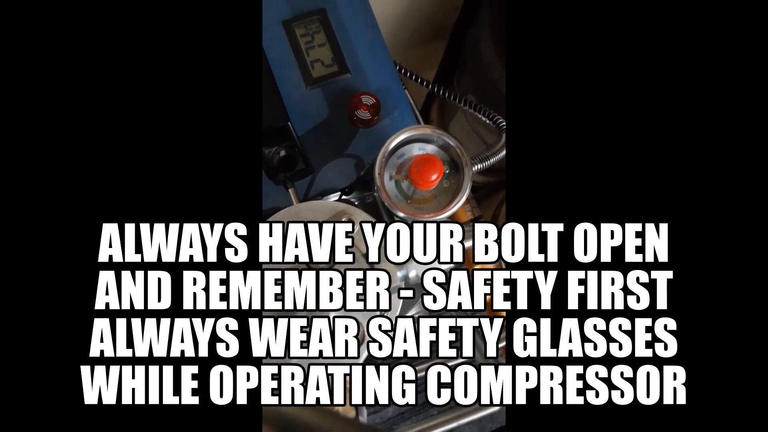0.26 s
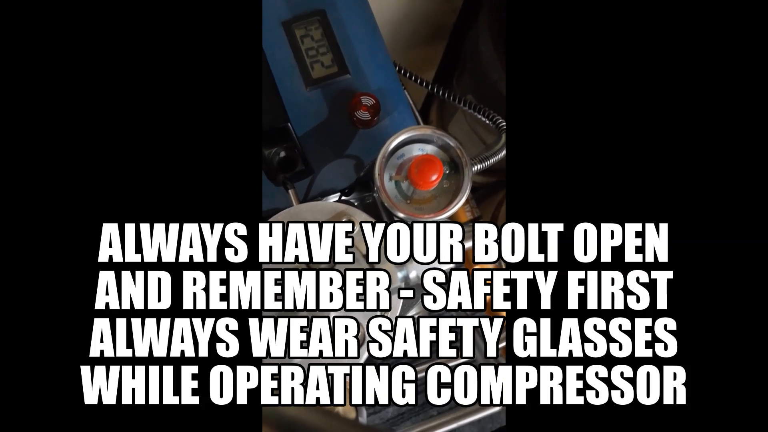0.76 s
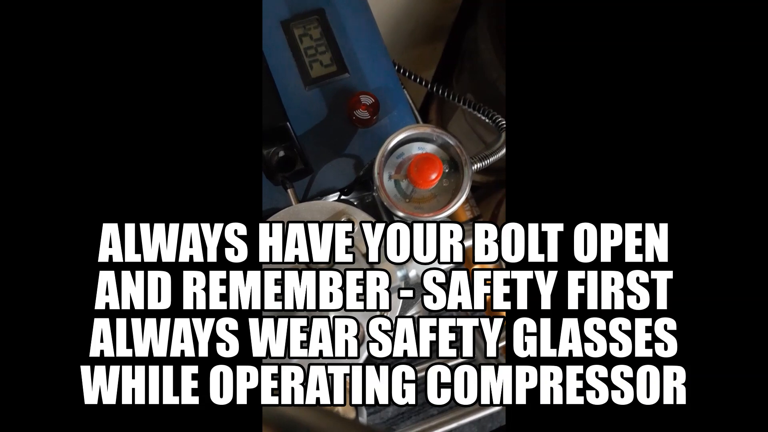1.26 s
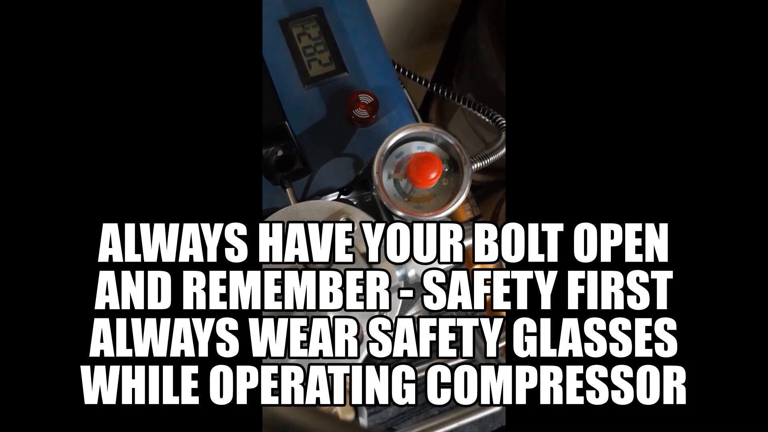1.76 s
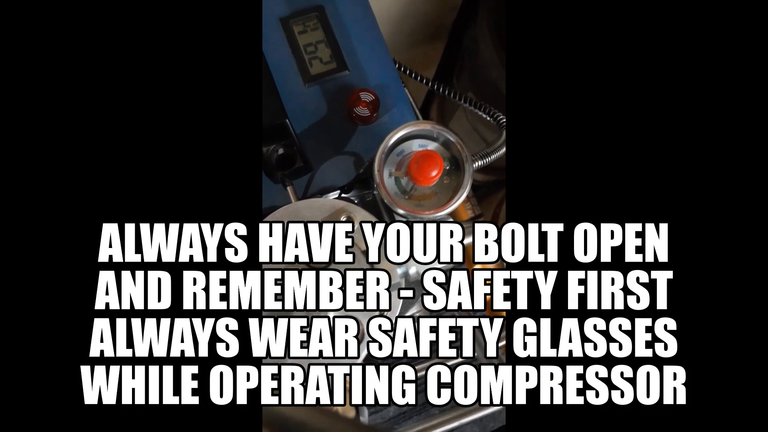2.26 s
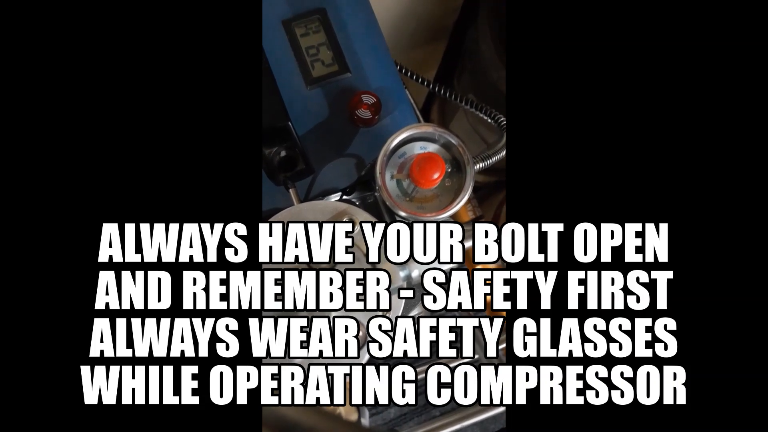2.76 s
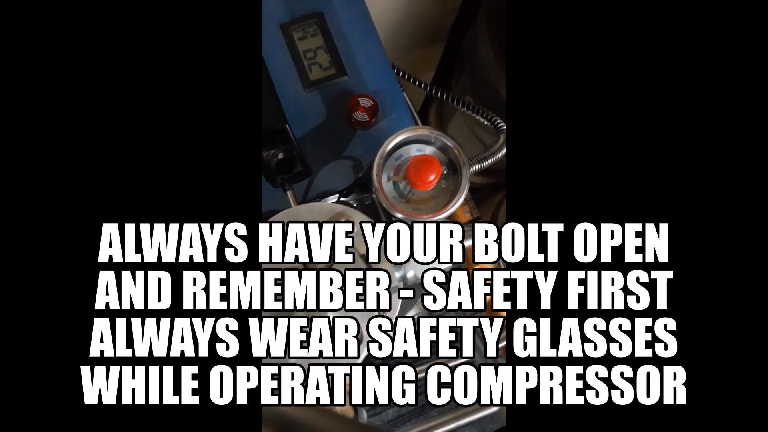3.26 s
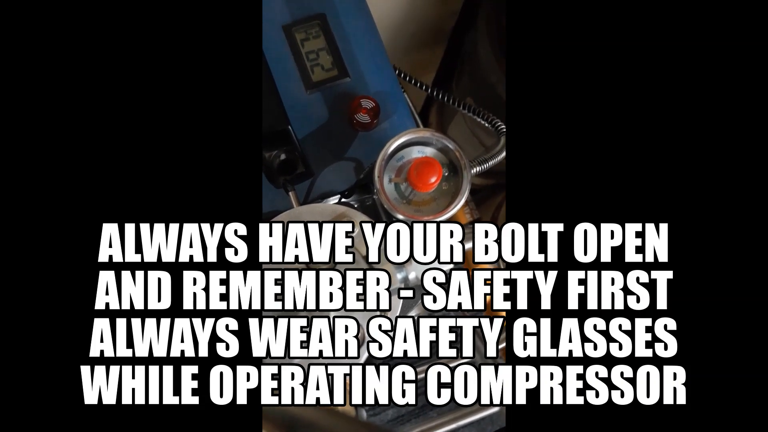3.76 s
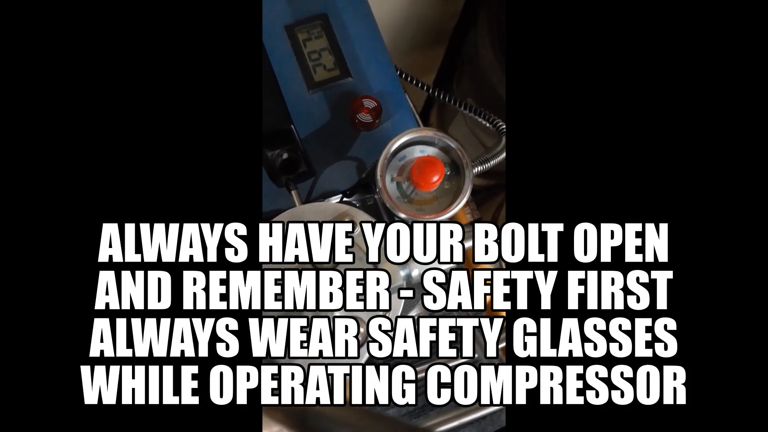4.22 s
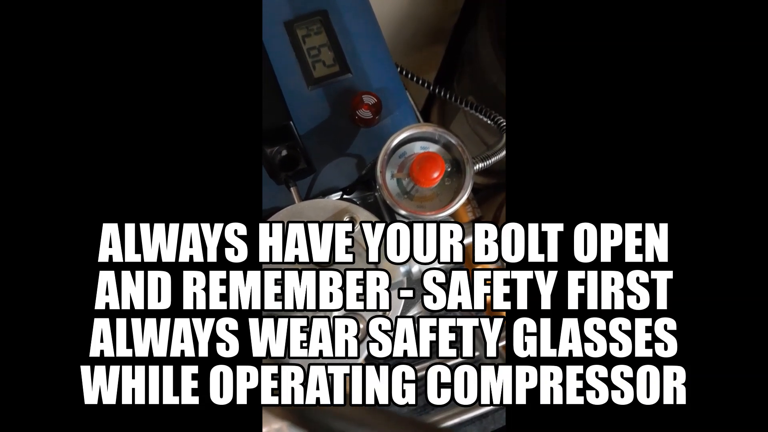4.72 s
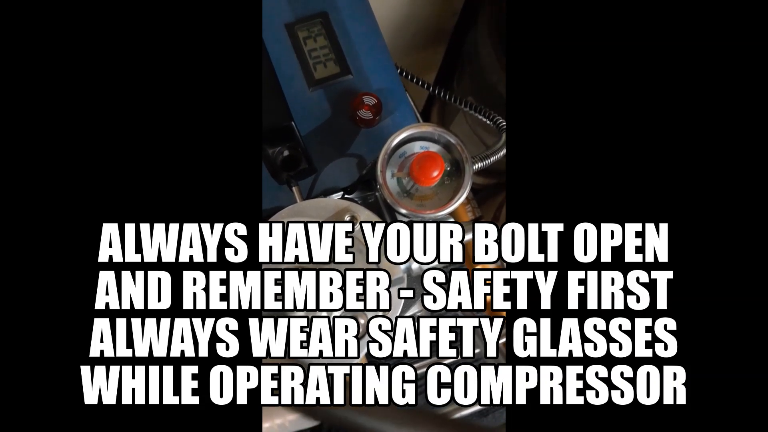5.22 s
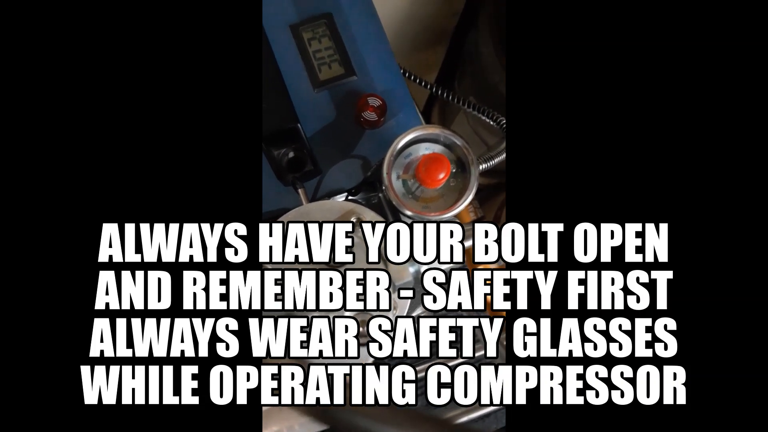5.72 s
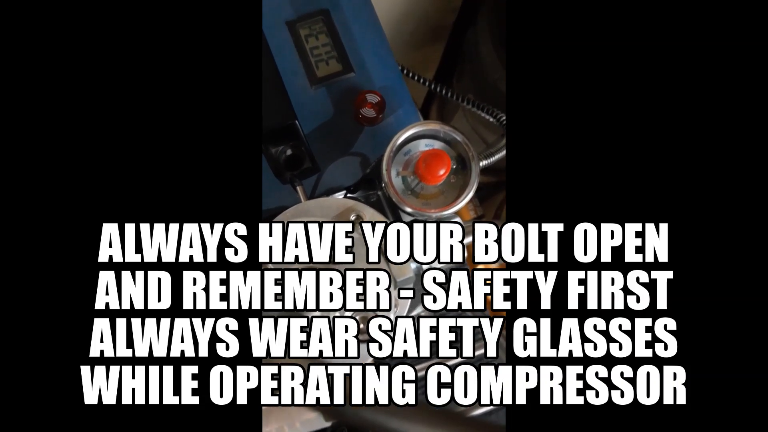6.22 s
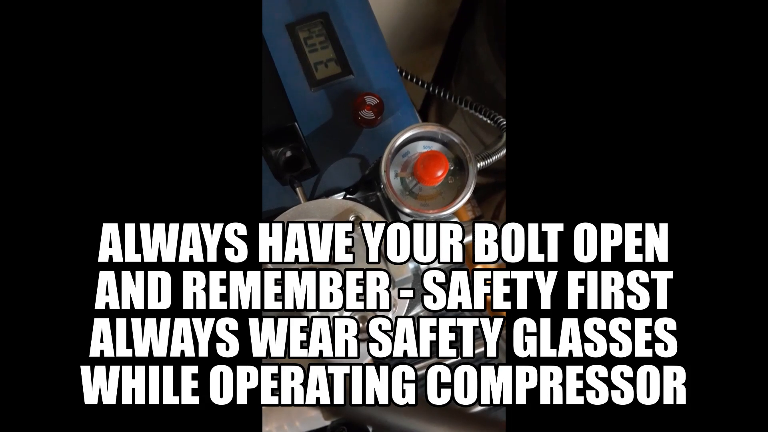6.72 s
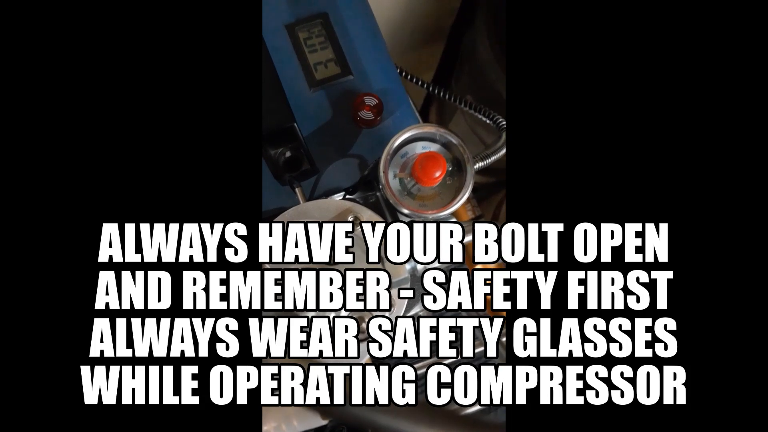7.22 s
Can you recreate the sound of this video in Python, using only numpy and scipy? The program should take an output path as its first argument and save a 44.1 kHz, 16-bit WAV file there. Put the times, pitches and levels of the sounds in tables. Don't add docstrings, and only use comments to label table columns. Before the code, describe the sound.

From 0 s a small high-pressure piston compressor is already at full speed, close to a phone with two microphone ports indoors, and it continues without pause to the end at about 7.4 s. Roughly fifty-six valve knocks per second merge into a dense, hard metallic hammering, with casing resonances around 500 to 900 Hz and brighter rattles above. A strong, steady hum near 336 Hz sits with it, wavering slightly. Each turn brings quick hisses of air before, at and after the knock, over soft broadband fan noise. A thin plate chatters and sings near 12 kHz, easing back gradually. Over the seconds the speed and pitch drop only very slightly; the casing ring gradually strengthens, and from about 6 s the hum swells modestly. The sound is loud, dry and close, with slightly different tone left and right, a cut top end and possible clipped peaks.

```python
import sys
import numpy as np
from scipy import signal
from scipy.fft import rfft, irfft, next_fast_len
from scipy.io import wavfile
from scipy.ndimage import uniform_filter1d

SR = 44100
rng = np.random.default_rng(int(sys.argv[2]) if len(sys.argv) > 2 else 0)


def dump_mix(stems):
    frames = np.atleast_2d(stems).T
    limited = np.clip(frames, -1, 1)
    pcm = np.round(limited * 32767).astype(np.int16)
    wavfile.write(sys.argv[1], SR, pcm)


def ratio_of_db(decibels):
    return 10 ** (np.asarray(decibels, float) / 20)


N = 329862

# (frequency [Hz], left level [dB], right level [dB])
FAN_COLOUR = [(20, -29, -34), (45, -12.5, -7), (171, -6.5, -17), (463, -4.5, -11), (920, -6, -9),
              (1050, -7.5, -9), (1500, -6, -2.5), (1550, -4.5, -8), (1970, -3.5, -7), (2720, -12, -5),
              (3900, -15.5, -12), (6500, -21.5, -28), (10000, -23, -29.5), (15700, -36.5, -22)]
# (frequency [Hz], left level [dB], right level [dB])
PUFF_COLOUR = [(706, -18, -21), (1200, -16, -21), (1770, -17, -16), (2520, -32, -26), (4000, -24.5, -11),
               (7000, -14.5, -15), (6900, -18, -18), (8230, -12.5, -21.5), (9800, -21, -21),
               (10170, -16, -21.5), (12900, -11, -18), (13900, -17.5, -25), (14900, -35, -30),
               (15900, -21, -32)]
# (frequency [Hz], likeness [0-1])
LIKENESS = [(60, 0.23), (300, 0.7), (1400, 0.15), (3000, 0), (7000, 0.05), (15000, 0)]
# (start [turns], rise [turns], hold [turns], fall [turns], level [dB])
AIR_PUFFS = [
    (0, .008, .012, .02, 0),
    (.02, .01, .06, .03, -6),
    (-.26, .03, .24, .02, -11),
    (.165, .008, .005, .015, -9),
    (.25, .008, .005, .02, -11),
]
# (time after the knock [turns], level [dB])
PLATE_TAPS = [
    (0, 0),
    (.03, -3),
    (.06, -2),
    (.15, -7),
    (.235, -9),
    (.8, -14),
    (.88, -13),
]
# (time after the knock [turns], level [dB])
VALVE_BLOWS = [
    (-.0126, 0),
]
# (time after the knock [turns], level [dB])
VALVE_BOUNCES = [
    (.17, -22.5),
    (.25, -20),
    (.48, -19),
    (.76, -16.5),
    (0.879, -26.5),
]
# (frequency [Hz], width [Hz], left gain [ratio], right gain [ratio])
CASING_MODES = [ (396, 8, -2.32, -4.51), (450, 8, -2.78, 1.2), (514, 8, -27.3, -22.2), (521, 11, 26.2, 22),
                (658, 55, 1.6, .21), (674, 8, -1.78, -1.92), (820, 28, -1.87, -1.29), (881, 8, 6.61, 3.82),
                (957, 12, .32, .69), (1134, 17, -2.82, -1.56), (1337, 287, -.09, 4.91),
                (1361, 178, .07, -5.16), (1581, 69, .95, -1.95), (1615, 51, .95, 1.8),
                (1804, 272, -2.86, -.58), (1899, 27, -.09, -1.78), (2106, 219, -1.35, 1.16),
                (2325, 2652, 1.27, -.96), (2359, 89, -.83, -.88), (2479, 111, -1.02, -.93),
                (2689, 590, -1.05, -.16), (3195, 91, .17, -.34), (3363, 600, -1, 1.28),
                (3448, 251, .36, -.73), (3941, 600, -.06, .68), (4614, 1200, -1.14, .16),
                (4723, 587, .62, .51), (5956, 295, -.57, .17), (3770, 90, .35, .55),
                (6453, 204, -.34, -1.02)]
# (multiple of shaft speed [ratio], left level [dB], right level [dB])
HOUSING_TONES = [(1, -53.3, -59.2), (2, -31.3, -31.4), (3, -36.4, -36.6), (4, -43.8, -39),
                 (5, -43.2, -31.4), (10, -50, -48), (11, -37, -36), (13, -43, -40)]

START_SPEED, FULL_SLOWING = 56.08995, .529835
FILL_S = 12.7605
FIRST_KNOCK_TURN = .0906
RIGHT_LAG = 14
KNOCK_DB = -1.1


def level(x, db):
    return x * ratio_of_db(db) / np.sqrt(np.mean(x ** 2))


def ring(x, hz, width):
    return signal.lfilter(*signal.iirpeak(hz, hz / width, fs=SR), x)


def walk(rate):
    span = int(SR / rate)
    smooth = uniform_filter1d(rng.standard_normal(N), span)
    return level(uniform_filter1d(smooth, span), 0)


def air(noise, colour):
    size = next_fast_len(N)
    log_hz = np.log(np.fft.rfftfreq(size, 1 / SR) + 1)
    hz, like = np.transpose(LIKENESS)
    like = np.clip(np.interp(log_hz, np.log(hz), like), 0, 1)
    shared, opposite = rfft(noise, size) * np.sqrt([1 + like, 1 - like])
    hz, *ports = np.transpose(colour)
    gain = ratio_of_db([np.interp(log_hz, np.log(hz), db) for db in ports])
    left, right = irfft(gain * [shared + opposite, shared - opposite], size)[:, :N]
    return level(np.array([left, np.roll(right, RIGHT_LAG)]), 0)


def pushes(turn, table, jitter_s, scatter_db, push_s):
    turns = np.arange(int(turn[0]), int(turn[-1]) + 1)
    chance = rng.standard_normal((len(turns), len(table), 2))
    share, db = np.transpose(table)
    at = np.interp(turns[:, None] + share, turn, np.arange(len(turn)))
    at = at + jitter_s * SR * chance[..., 0]
    near = np.clip(at.astype(int)[..., None] + np.arange(-16, 17), 0, len(turn) - 1)
    bell = np.exp(-.5 * ((near - at[..., None]) / (push_s * SR)) ** 2)
    push = bell * ratio_of_db(db + scatter_db * chance[..., 1])[..., None]
    return np.bincount(near.ravel(), push.ravel(), len(turn))


def fan():
    return air(rng.standard_normal((2, N)), FAN_COLOUR) * ratio_of_db(-27.0 + .5 * walk(6.1))


def puffs(turn):
    scatter_db = 1.2
    size = ratio_of_db(scatter_db * rng.standard_normal((int(turn[-1]) + 3, len(AIR_PUFFS))))
    gate = 0
    for k, (share, rise, hold, fall, db) in enumerate(AIR_PUFFS):
        since = (turn - share + .25) % 1 - .25
        cycle = np.round(turn - share - since).astype(int) + 1
        swell_and_fade = np.minimum(since / rise, (hold - since) / fall)
        gate = gate + ratio_of_db(db) * size[cycle, k] * np.exp(np.minimum(swell_and_fade, 0))
    return air(gate * rng.standard_normal((2, N)), PUFF_COLOUR) * ratio_of_db(KNOCK_DB - 34)


def plate(turn, ring_db):
    taps = pushes(turn, PLATE_TAPS, jitter_s=1.6e-5, scatter_db=.6, push_s=1.5e-5)
    rub = ratio_of_db(-7.0) * rng.standard_normal((2, N))
    taps = level(taps - taps.mean(), 0) + rub
    low, high = ring(taps, 12230, 230), ring(taps, 12490, 200)
    left, right = ring(low + ratio_of_db([[-6], [-2]]) * high, 12330, 600)
    both = level(np.array([left, np.roll(right, RIGHT_LAG)]), 0)
    return both * ratio_of_db(ring_db + np.array([[1], [-2]]))


def valve(turn, swell_db):
    earlier = turn[0] - np.arange(SR // 2, 0, -1) * START_SPEED / SR
    turn = np.concatenate([earlier, turn])
    even = pushes(turn, VALVE_BLOWS, jitter_s=0, scatter_db=0, push_s=5e-5)
    uneven = pushes(turn, VALVE_BLOWS, jitter_s=1.1e-5, scatter_db=.5, push_s=6e-5)
    uneven = uneven + pushes(turn, VALVE_BOUNCES, jitter_s=.00041, scatter_db=1.0, push_s=7e-5)
    heavy = light = 0
    for hz, width, left, right in CASING_MODES:
        gain = np.array([[left], [right]])
        if hz < 1200:
            heavy = heavy + gain * ring(even, hz, width)
        else:
            light = light + gain * ring(uneven, hz, width)
    return heavy[:, -N:] * ratio_of_db(swell_db - .9) + light[:, -N:] * ratio_of_db(KNOCK_DB + 1.7)


def housing(turn, hum_db):
    left_lead = np.array([[.0276], [0]])
    pan = ratio_of_db(np.array([[-1.3], [1.3]]))
    angle = 2 * np.pi * 6 * (turn + .0093 + left_lead)
    hum = np.cos(angle + .05 * walk(60)) * ratio_of_db(.4 * walk(70))
    panel = ring(ring(rng.standard_normal((2, N)), 350, 150), 350, 150)
    panel = level(panel, -24.5)
    tones = 0
    for k, left, right in HOUSING_TONES:
        tone = np.cos(2 * np.pi * k * turn - 2.1) * ratio_of_db(.39 * walk(21))
        tones = tones + ratio_of_db([[left], [right]]) * tone
    return pan * ratio_of_db(hum_db + 1.5) * (np.sqrt(2) * hum + panel) + np.sqrt(2) * tones


def scene():
    pressure = 1 - np.exp(-np.arange(N) / SR / FILL_S)
    turn = np.cumsum(START_SPEED - FULL_SLOWING * pressure) / SR - FIRST_KNOCK_TURN
    load = pressure / pressure[-1]
    hum_db = -15 + 1.5 * load ** 8
    ring_db = -37.5 - 4 * load ** 2
    knock_turn = turn - .0015 * load
    background = fan() + puffs(turn) + plate(turn, ring_db)
    return background + valve(knock_turn, 2.5 * load) + housing(turn, hum_db)


def band_limit(x):
    return signal.sosfilt(signal.butter(12, 15860, fs=SR, output="sos"), x)


def record(dry):
    top_cut = signal.ellip(10, .2, 80, 15780, fs=SR, output="sos")
    heard = signal.sosfilt(top_cut, dry)
    return band_limit(np.clip(heard, -1, 1))


dry = scene()
out = record(dry)
dump_mix(out)
```